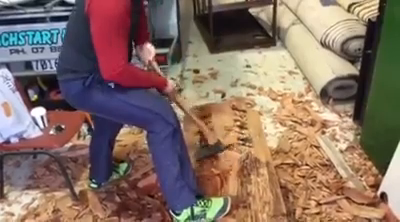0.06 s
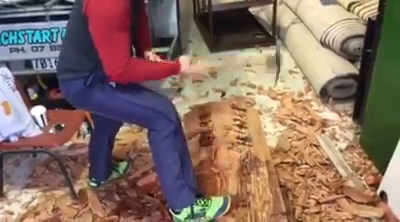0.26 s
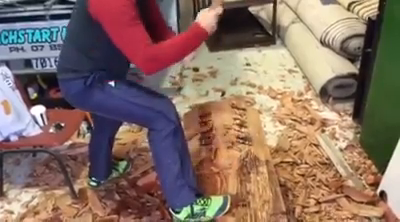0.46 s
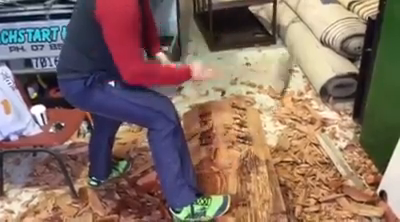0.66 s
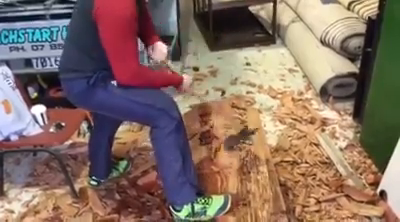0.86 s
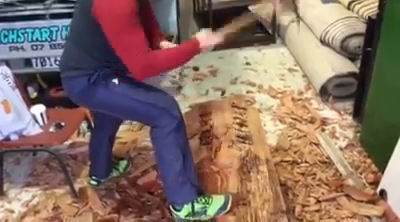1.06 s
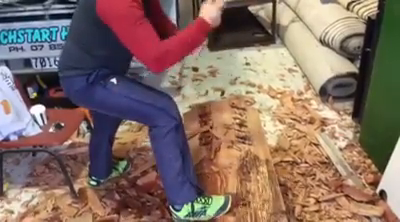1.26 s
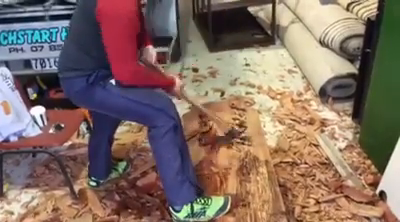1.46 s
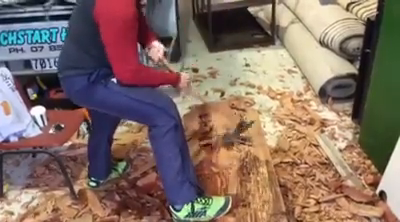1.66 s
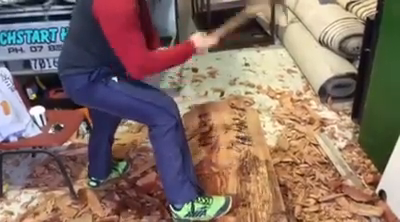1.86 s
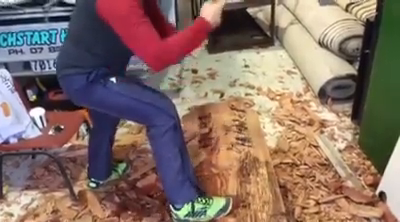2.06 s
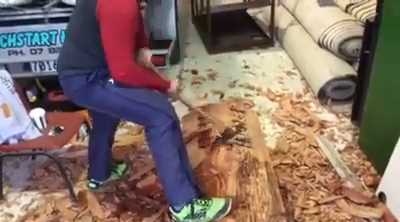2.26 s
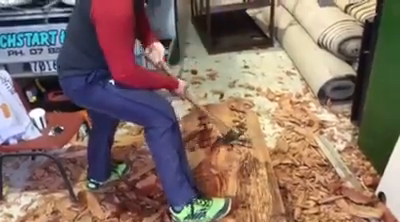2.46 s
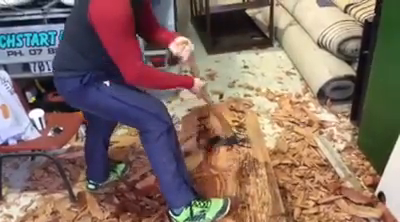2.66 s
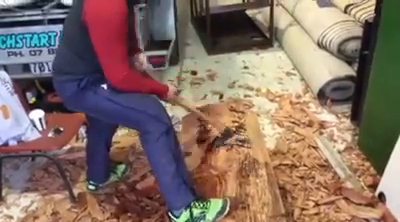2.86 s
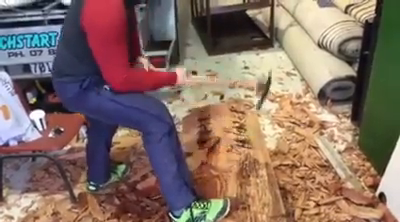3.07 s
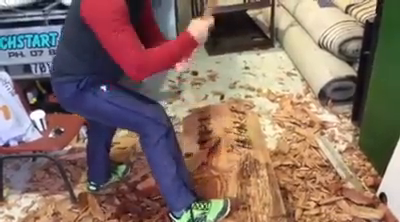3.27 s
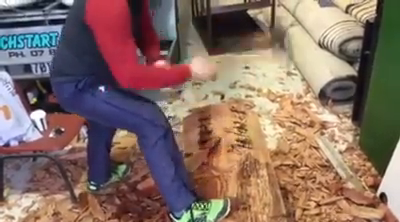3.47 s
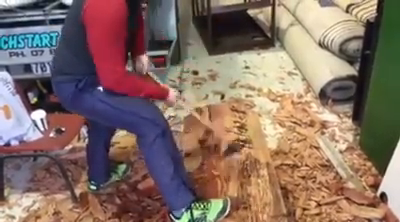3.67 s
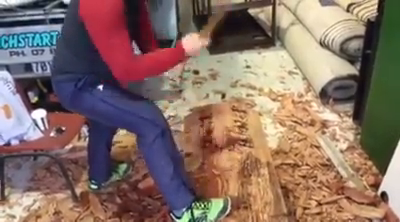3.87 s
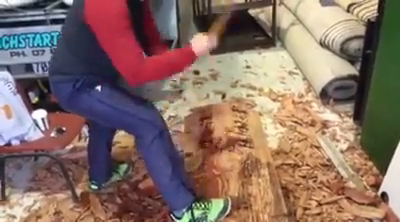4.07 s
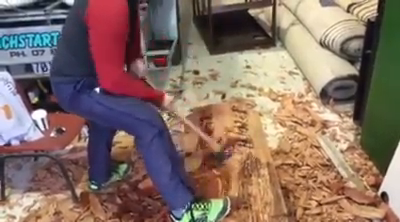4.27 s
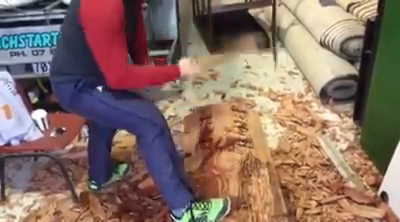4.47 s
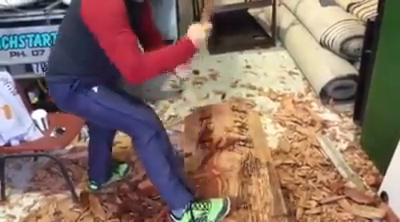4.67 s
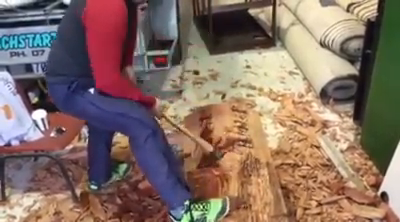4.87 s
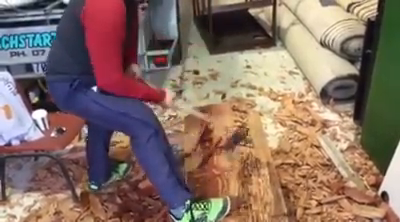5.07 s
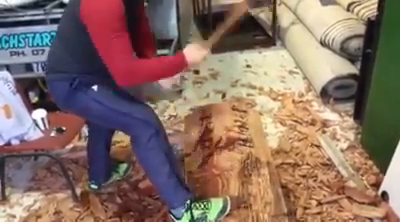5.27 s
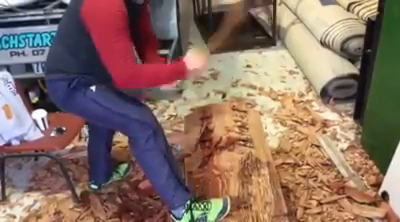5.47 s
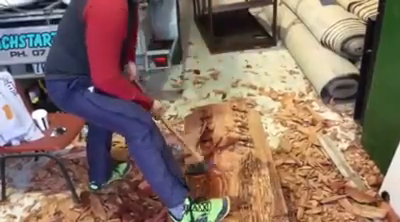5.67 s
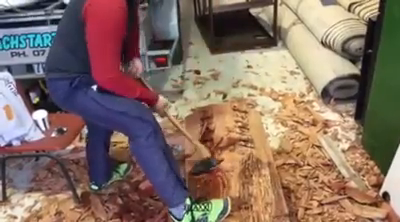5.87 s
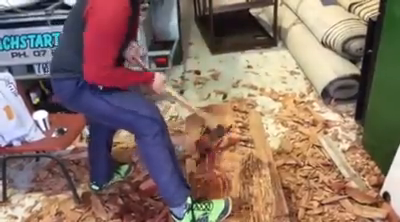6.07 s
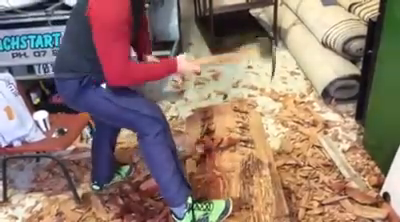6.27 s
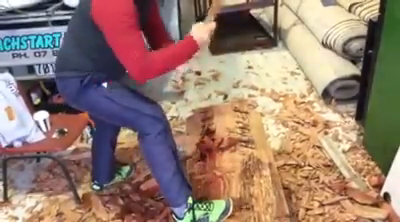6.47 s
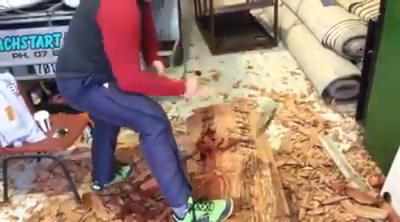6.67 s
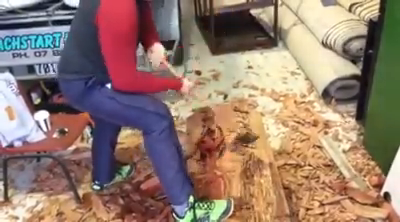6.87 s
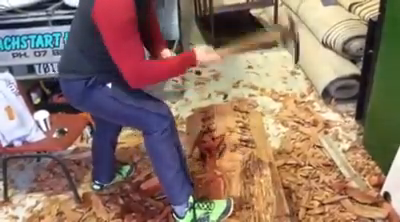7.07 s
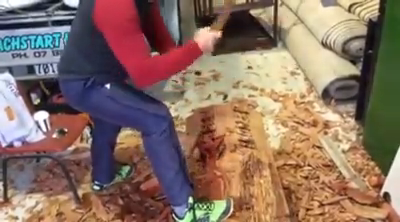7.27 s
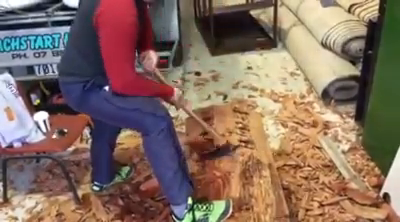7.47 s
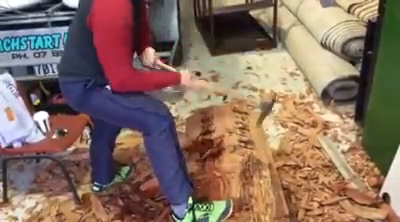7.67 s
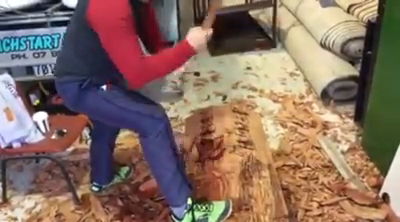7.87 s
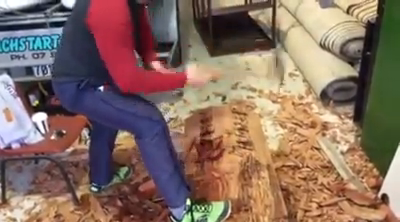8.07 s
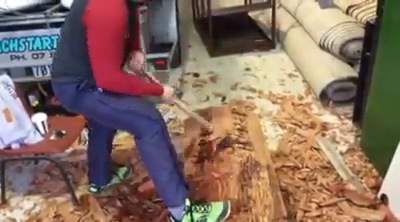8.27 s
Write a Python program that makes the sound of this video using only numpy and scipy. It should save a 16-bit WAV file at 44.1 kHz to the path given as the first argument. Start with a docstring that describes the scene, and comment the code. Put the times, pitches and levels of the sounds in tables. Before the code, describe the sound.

In an echoing workshop, a hand adze strikes a heavy wooden slab on the floor. Each chop is a loud, short crunch with a dull woody knock and low floor thud. After the third blow, a chip is levered up, tears and snaps off brightly while the blade rings; chopping resumes, and after the seventh another chip cracks away. Faint rustles and ticks sit over soft air noise and a low hum. One microphone nearby.

```python
"""A workshop, one microphone: steady air noise and faint brushes of clothes and shavings, with light ticks.
Then a hand adze chops a wooden slab on the floor, ten blows, with longer pauses after the third and seventh.
Each blow is a crunch of tiny fibre snaps over the damped modes of slab and floor; the room echoes and booms.
During the early blows a low hum of narrow-band noise comes in and stays.
In those two pauses a chip is levered up and tears off in bursts of snaps; the first time the blade rings."""
import sys
import numpy as np
from scipy import signal
from scipy.fft import rfft, irfft, next_fast_len
from scipy.io import wavfile
from scipy.ndimage import uniform_filter1d, map_coordinates

SR = 44100
rng = np.random.default_rng(int(sys.argv[2]) if len(sys.argv) > 2 else 0)


def master(y):
    """Save y as 16-bit WAV."""
    cut = np.clip(np.atleast_2d(y).T, -1, 1)
    pcm = np.round(cut * 32767)  # scale
    wavfile.write(sys.argv[1], SR, pcm.astype(np.int16))


N = 366912

# Air noise of the place. Each row: frequency in Hz, relative density in dB per Hz.
AIR_SPECTRUM = [(25, -22), (50, -5.5), (100, -2), (230, -6), (420, -16), (650, -12.5), (880, -14.5),
                (1250, -10), (2300, -18), (3000, -18.5), (4600, -26), (8000, -36.5), (12000, -38),
                (15000, -54)]
AIR_DB, AIR_DRIFT_DB = -47.5, 2  # middle level and size of its slow drift
HUM_DB, HUM_ON_S, HUM_RISE_S = -54, 2.2, .6  # full level, moment it is half up, slowness of its entry

# Brushes of clothes and shavings. Each row: moment of the peak in seconds, level in dB.
RUSTLES = [(0.029, -47), (0.21, -51.5), (2.19, -51.5), (2.24, -54), (3.07, -42), (3.99, -50), (6.52, -52),
           (7.09, -54)]
RUSTLE_S = 0.031  # from the peak of a brush until it has fallen to 1/e
# Colour of the brushes. Each row: frequency in Hz, relative density in dB per Hz.
CLOTH_SPECTRUM = [(200, -13), (1500, 5.5), (4000, -0.5), (7000, -5), (12000, -7), (15000, -18)]
# Light ticks of the handle and of falling chips. Each row: start in seconds, level in dB, resonance in Hz.
TICKS = [(0.2965, -27.5, 1780), (0.3005, -28, 1550), (2.047, -39, 950), (2.188, -42.5, 3000),
         (2.229, -41, 2930), (3.029, -32.5, 744), (3.070, -40, 4410), (3.97, -36.5, 4000),
         (7.088, -33, 2200), (8.2175, -31, 3900)]
# Colour shared by the ticks. Each row: frequency in Hz, relative density in dB per Hz.
TICK_SPECTRUM = [(100, -25.5), (600, -2.5), (1500, -3), (4200, -3.5), (7000, -14), (15000, -25)]

# Blows of the adze. Each row: moment in seconds, level of the crunch in dB, slab knock in dB,
# slab drone in dB, body of the crunch in dB, its treble in dB, chip resonance in dB.
CHOPS = [(0.8249, -8.5, -8, -24.5, -4.5, 1.5, 0.5), (1.5456, -5.5, -15.5, -28, 1.5, 5, 1.5),
         (2.348, -7.5, -9.5, -25, 2.5, 4.5, 3), (3.6534, -6, -11.5, -26.5, -7, 0, 4.5),
         (4.3431, -8.5, -9, -26.5, 2.5, 3.5, 7.5), (4.9866, -6.5, -16, -42, 2, 5.5, 2),
         (5.7189, -9, -16, -24, 0, 2.5, 2), (6.8418, -8.5, -11.5, -27, -1.5, 2, 3.5),
         (7.587, -6.5, -17, -53, -7, -.5, 2), (8.2824, -8, -18.5, -28.5, -4, 5.5, 8.5)]
ENTRY_S, CUT_S = .0026, 0.014  # the edge enters, then runs through the grain
CHOP_ECHO_DB = -3.5  # answer of the room to the crunch
CHIP_HZ = 2014  # resonance of the chip that a blow lifts
THUD_DB = -22.5  # floor thud, relative to the crunch
BOOM_DB = -33  # room boom, alike for every blow
# Colour of the crunch. Each row: frequency in Hz, relative density in dB per Hz.
CRUNCH_SPECTRUM = [(40, -21.5), (200, -13.5), (340, -1), (415, -15), (500, -1.5), (800, -2.5), (1150, -2.5),
                   (1600, 0.5), (2300, -3.5), (4200, -2.5), (5000, -8.5), (6300, -8), (7600, -13.5),
                   (12000, -14.5), (15000, -21.5)]
# Narrow peaks and dips in the colour of every blow. Each row: centre in Hz, height in dB.
CRUNCH_RIPPLE = [(1570, 0.5), (1720, -0.5), (2250, 2), (2490, 2.5), (3360, 0), (4090, 0), (4450, -3.5),
                 (4790, 1), (6180, 1)]
# Short modes of the slab, its knock. Each row: nominal frequency in Hz, nominal level in dB, t60 in seconds.
SLAB_MODES = [(243.4, -7.5, 0.044), (332.4, -9.5, 0.094), (475.4, -6.5, 0.13), (641.5, 4, 0.047),
              (760, -0.5, 0.043), (975, -10, 0.0502)]
# Longer modes of the slab, its drone. Each row: nominal frequency in Hz, nominal level in dB, t60 in seconds.
DRONE_MODES = [(234.8, 2, 0.59), (270.6, -19.5, 0.31), (311.4, -5, 0.33), (346, -8, .38), (608, -4.5, 0.65),
               (675, -7.5, 0.41)]
# Floor thud. Each row: nominal frequency in Hz, nominal level in dB, t60 in seconds.
THUD_MODES = [(124.2, 1, 0.37), (146.6, -1.5, 0.18), (159.7, -4.5, 0.51), (181.5, -3, 0.74)]
# Boom of the room. Each row: nominal frequency in Hz, nominal level in dB, t60 in seconds.
BOOM_MODES = [(67.9, 3, 0.5), (86.2, -9, 0.33)]

# A chip splitting off. Each row: moment in seconds, level in dB, chip resonance in Hz, length in seconds.
SPLITS = [(2.631, -24.5, 3784, 0.0022), (2.634, -18.5, 3610, .0085), (2.6662, -3, 3580, 0.0046),
          (2.761, -28, 3780, .011), (6.0594, -19, 6140, 0.0069), (6.0792, -10.5, 6500, .012),
          (6.083, -11.5, 6050, .0056), (6.093, -8, 3030, .002), (6.115, -12, 3070, 0.0018)]
SPLIT_KNOCK_DB = -41  # slab knock, relative to the split
# Colour of splitting and tearing wood. Each row: frequency in Hz, relative density in dB per Hz.
SPLINTER_SPECTRUM = [(60, -36), (300, -17), (800, -21.5), (1500, -8.5), (3000, -0.5), (6500, -1),
                     (8500, -4), (12000, -6), (15000, -13.5)]
# A chip levered up along the grain. Each row: moment of full pull in seconds, length in seconds, level in dB.
TEARS = [(2.634, .14, -28.5), (6.084, 0.042, -25.5)]
TEAR_BUILD_DB = 37  # growth over one length before full pull
TEAR_STOP_DB_PER_S = 1294  # fall once the chip is off
# The stuck blade breaks free once: moment, slab knock, ring of the blade and its decay time in seconds.
FREE_S, FREE_KNOCK_DB, FREE_RING_DB, BLADE_T60 = 2.6655, -21, -22, 0.59
# Colour of the ringing blade. Each row: frequency in Hz, relative density in dB per Hz.
BLADE_SPECTRUM = [(600, -35), (1200, -14.5), (1340, -1.5), (1480, -4.5), (1650, -15.5), (2200, -15),
                  (3300, -19.5), (3900, -11), (4500, -26), (9000, -42)]

# Reverberation time of the room. Each row: frequency in Hz, t60 in seconds.
ROOM_T60 = [(100, 0.81), (400, 0.62), (1000, 0.62), (2200, 0.76), (4000, 0.82), (7000, 0.7), (14000, 0.41)]
# Answer of the walls. Each row: frequency in Hz, relative level in dB.
ROOM_DB = [(60, 14), (300, 7), (410, 0.5), (650, 3.5), (1100, -1.5), (2000, -3), (4200, -3), (4700, -4),
           (6500, -3.5), (8000, -3.5), (15000, -2.5)]
TOP_HZ = 14950  # band limit


def amp(db):
    """Decibels to gain."""
    return 10 ** (np.asarray(db) / 20)


def unit(x):
    """Scale to rms 1."""
    return x / np.sqrt(np.mean(x ** 2) + 1e-20)


def along(points, hz):
    """(Hz, value) points read on a log frequency axis."""
    f, v = np.transpose(points)
    return np.interp(np.log(hz + 1), np.log(f + 1), v)


def add(track, s, sound):
    """Mix a sound into the track at time s, cut at the end of the track."""
    place = track[round(s * SR):][:len(sound)]
    place += sound[:len(place)]


def coloured(x, db_of_hz):
    """x through a causal, minimum-phase filter of this shape that keeps the power of white noise."""
    m = 2 * next_fast_len(len(x) // 2 + 2048)
    gain = unit(amp(db_of_hz(np.fft.rfftfreq(m, 1 / SR))))
    cepstrum = irfft(np.log(gain))
    # folding the cepstrum onto positive time makes the filter causal
    cepstrum[1:m // 2] *= 2
    cepstrum[m // 2 + 1:] = 0
    response = np.exp(rfft(cepstrum))
    return irfft(rfft(x, m) * response)[:len(x)]


def hump(hz, centre_hz, octaves):
    """A resonance, bell-shaped over octaves, 1 at its centre."""
    return np.exp(-.5 * (np.log2((hz + 1) / centre_hz) / octaves) ** 2)


def fibres(size, spread_db):
    """Dense tiny snaps of unequal strength, rms 1."""
    draws = np.clip(rng.standard_normal(size // 6 + 1), -2, 2)
    strength = np.repeat(amp(spread_db * draws), 6)[:size]  # one strength per six samples
    return unit(rng.standard_normal(size) * strength)


def burst(rise, length, release, spread_db):
    """Fibres give way faster and faster as the split opens, ease off while it runs, then die away."""
    t = np.arange(SR // 8) / SR - 2 * rise  # time from the moment the split is half open
    opening = 1 / (1 + np.exp(-np.pi * t / rise))
    easing = 1.3 * np.maximum(t, 0) / length
    ending = np.maximum(t - length, 0) / release
    force = opening * np.exp(-easing - ending)
    snaps = force * fibres(len(t), spread_db)
    snaps = snaps * np.linalg.norm(force) / np.linalg.norm(snaps)  # same energy at every draw
    return np.pad(snaps, (0, SR - len(t)))


def ring(modes, attack):
    """Damped modes; strength, phase and tuning change a little with the spot that is struck."""
    t = np.arange(SR) / SR
    hz, db, t60 = np.transpose(modes)[:, :, None]
    level, shift, phase = rng.standard_normal((3, len(modes), 1))
    hz = hz * (1 + .008 * shift)
    db = db + 1.5 * level
    waves = amp(db - 60 * t / t60) * np.sin(2 * np.pi * (hz * t + phase))
    return waves.sum(0) * (1 - np.exp(-t / attack))


def room_tail():
    """One second of echo, energy 1: separate strong reflections merge into a diffuse, uneven decay."""
    age = np.arange(SR) / SR
    sparse = np.exp(-age / .09)  # share of separate reflections
    reflections = np.sqrt(sparse) * fibres(SR, spread_db=7)
    diffuse = np.sqrt(1 - sparse) * rng.standard_normal(SR)
    hz, t, z = signal.stft(reflections + diffuse, SR, nperseg=512)
    # patches over neighbouring frequencies and moments make the decay uneven
    patches = uniform_filter1d(rng.standard_normal(z.shape), size=4, axis=0)
    patches = unit(uniform_filter1d(patches, size=5, axis=1))
    uneven = amp(1.6 * patches)
    decay = amp(along(ROOM_DB, hz)[:, None] - 60 * t / along(ROOM_T60, hz)[:, None])
    tail = signal.istft(z * uneven * decay, SR, nperseg=512)[1][:SR]
    tail = tail * (1 - np.exp(-(age / 0.0064) ** 2))  # the echo builds over a few milliseconds
    return tail / np.linalg.norm(tail)


def with_echo(snaps, wet_db):
    """A short burst and the diffuse echo that its energy feeds."""
    return snaps + amp(wet_db) * np.linalg.norm(snaps) * room_tail()


def in_room(x, wet_db):
    """A longer sound and its reverberation, by convolution with the room's echo."""
    return x + amp(wet_db) * signal.fftconvolve(x, room_tail())[:len(x)]


def background():
    """Air noise whose level drifts slowly, and a low wavering hum of narrow-band noise that comes in and stays."""
    t = np.arange(N) / SR
    air = coloured(rng.standard_normal(N), lambda hz: along(AIR_SPECTRUM, hz))
    hum = coloured(rng.standard_normal(N), lambda hz: 90 * hump(hz, 67.5, 0.19))
    drift = map_coordinates(rng.standard_normal(N // SR + 4), [t])  # smooth through one draw a second
    swell = 1 / (1 + np.exp((HUM_ON_S - t) / HUM_RISE_S))
    drifting_air = amp(AIR_DB + AIR_DRIFT_DB * drift) * unit(air)
    return drifting_air + amp(HUM_DB) * swell * unit(hum)


def rustles():
    """Clothes and shavings brush softly: noise-like snaps under bell-shaped strokes."""
    t = np.arange(N) / SR
    stroke = sum(amp(db) * np.exp(-((t - s) / RUSTLE_S) ** 2) for s, db in RUSTLES)
    cloth = coloured(fibres(N, spread_db=4.5), lambda hz: along(CLOTH_SPECTRUM, hz))
    return in_room(stroke * cloth, wet_db=-3.0)


def ticks():
    """Handle and falling chips tick: very short bursts through one broad resonance each, with an echo."""
    out = np.zeros(N)
    for s, db, tick_hz in TICKS:
        def shape(hz):
            return along(TICK_SPECTRUM, hz) + 10 * hump(hz, tick_hz, 0.81)

        snaps = burst(rise=0.00045, length=0.0048, release=.002, spread_db=1.0)
        add(out, s, amp(db) * coloured(with_echo(snaps, wet_db=0.5), shape))
    return out


def chops():
    """The edge crunches through the grain; the slab knocks and drones, floor and room boom after it."""
    out = np.zeros(N)
    for s, db, knock_db, drone_db, body_db, treble_db, chip_db in CHOPS:
        # each cut has its own chip, depth and sharpness
        def shape(hz):
            ripple = sum(ripple_db * hump(hz, centre_hz, 0.045) for centre_hz, ripple_db in CRUNCH_RIPPLE)
            chip = chip_db * hump(hz, CHIP_HZ, 0.22)
            body = body_db * hump(hz, 400, 0.59)
            treble = treble_db * hz ** 2 / (hz ** 2 + 4500 ** 2)
            return along(CRUNCH_SPECTRUM, hz) + ripple + chip + body + treble

        snaps = burst(rise=ENTRY_S, length=CUT_S, release=.005, spread_db=2.5)
        crunch = coloured(with_echo(snaps, CHOP_ECHO_DB), shape)
        add(out, s - ENTRY_S, amp(db) * crunch)
        add(out, s, amp(knock_db) * in_room(ring(SLAB_MODES, attack=0.0024), wet_db=-12.0))
        add(out, s, amp(drone_db) * ring(DRONE_MODES, attack=0.0066))
        add(out, s, amp(db + THUD_DB) * ring(THUD_MODES, attack=0.014))
        add(out, s, amp(BOOM_DB) * ring(BOOM_MODES, attack=0.0115))
    return out


def levering_knock():
    """The slab knocks in the room, with a sharper attack than under a blow."""
    return in_room(ring(SLAB_MODES, attack=.001), wet_db=-13.0)


def splits():
    """A chip snaps off in short bursts coloured by its resonance; each one knocks the slab."""
    out = np.zeros(N)
    for s, db, chip_hz, length in SPLITS:
        def shape(hz):
            return along(SPLINTER_SPECTRUM, hz) + 6 * hump(hz, chip_hz, 0.11)

        snaps = burst(rise=.0007, length=length, release=.002, spread_db=5)
        add(out, s - .001, amp(db) * coloured(with_echo(snaps, wet_db=-14.5), shape))
        add(out, s, amp(db + SPLIT_KNOCK_DB) * levering_knock())
    return out


def pull(s, length):
    """Strength of one tear: it builds as the handle is levered, holds, and stops when the chip is off."""
    t = np.arange(N) / SR - s
    build_db = TEAR_BUILD_DB * np.minimum(t, 0) / length
    stop_db = TEAR_STOP_DB_PER_S * np.maximum(t - length, 0)
    return amp(build_db - stop_db)


def tearing():
    """Fibres tear along the grain, a dense run of snaps as strong as the pull."""
    force = sum(amp(db) * pull(s, length) for s, length, db in TEARS)
    tear = force * coloured(fibres(N, spread_db=7), lambda hz: along(SPLINTER_SPECTRUM, hz))
    return in_room(tear, wet_db=-3.0)


def blade_free():
    """The freed blade rings as decaying coloured noise, damped by the wood; the slab knocks."""
    out, t = np.zeros(N), np.arange(SR) / SR
    blade = coloured(rng.standard_normal(SR), lambda hz: along(BLADE_SPECTRUM, hz))
    ringing = amp(FREE_RING_DB - 60 * t / BLADE_T60) * blade
    add(out, FREE_S, amp(FREE_KNOCK_DB) * levering_knock() + ringing)
    return out


def scene():
    """All sources at one microphone."""
    levering = splits() + tearing() + blade_free()
    return (background() + rustles() + ticks() + chops() + levering)[None]


def record(dry):
    """The microphone sheds deep bass, peaks are rounded off near full scale, all above the band limit goes."""
    thinned = signal.sosfilt(signal.butter(2, 38, "highpass", fs=SR, output="sos"), dry)
    rounded = thinned / (1 + np.abs(thinned / 1.05) ** 6) ** (1 / 6)
    m = next_fast_len(N + SR // 2)
    in_band = np.fft.rfftfreq(m, 1 / SR) < TOP_HZ
    return irfft(rfft(rounded, m) * in_band, m)[..., :N]


dry = scene()
out = record(dry)
master(out)
```